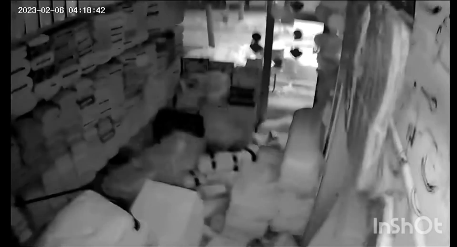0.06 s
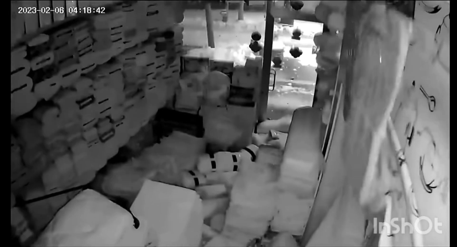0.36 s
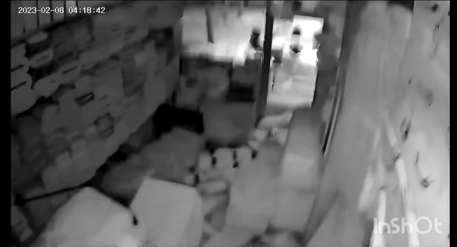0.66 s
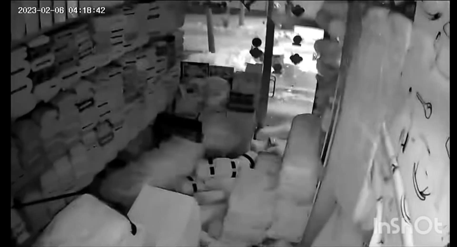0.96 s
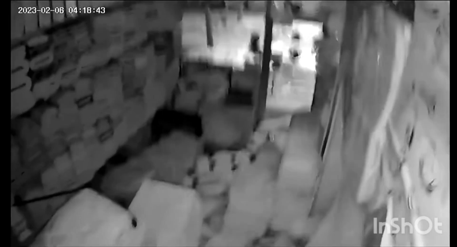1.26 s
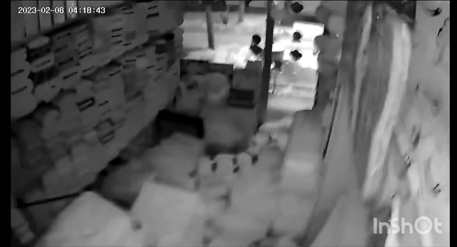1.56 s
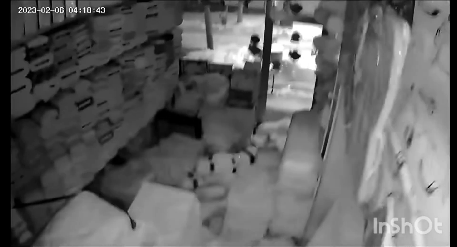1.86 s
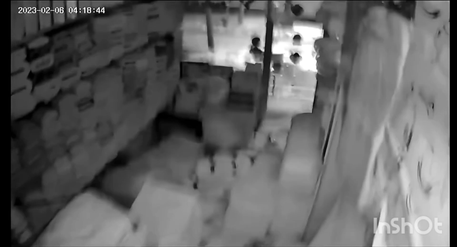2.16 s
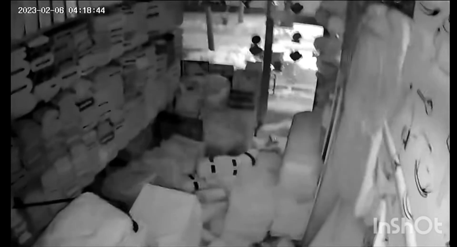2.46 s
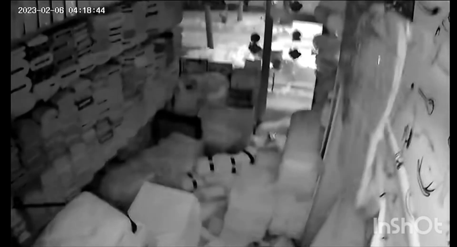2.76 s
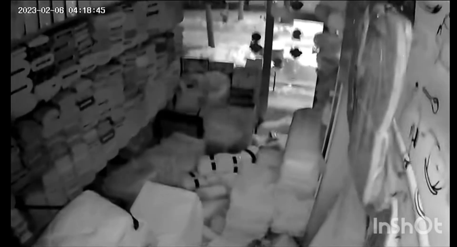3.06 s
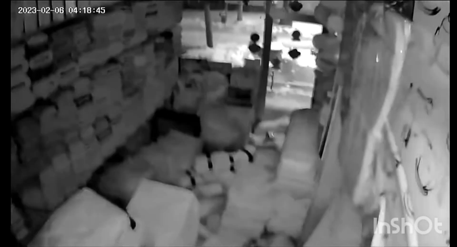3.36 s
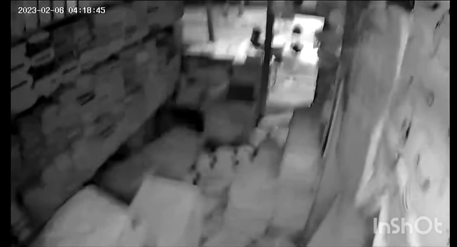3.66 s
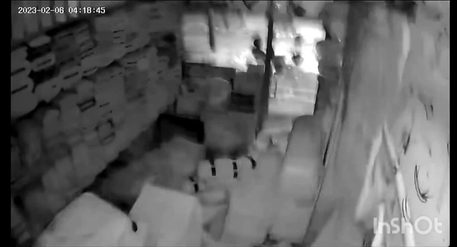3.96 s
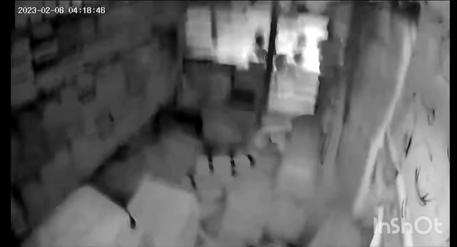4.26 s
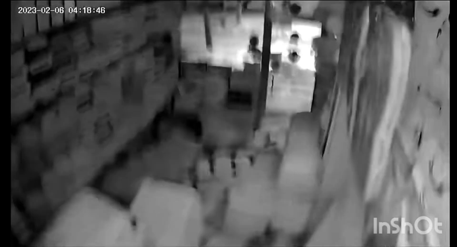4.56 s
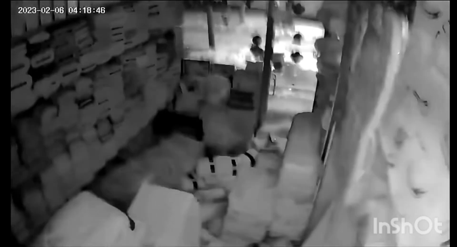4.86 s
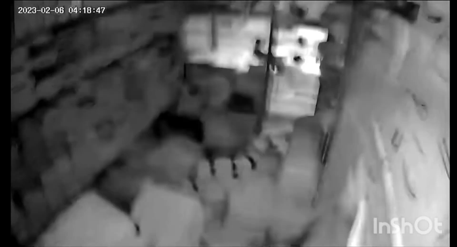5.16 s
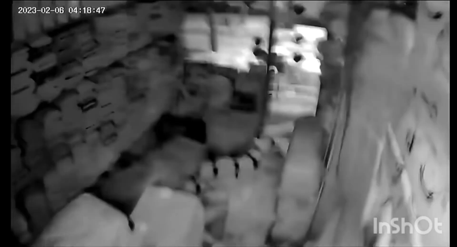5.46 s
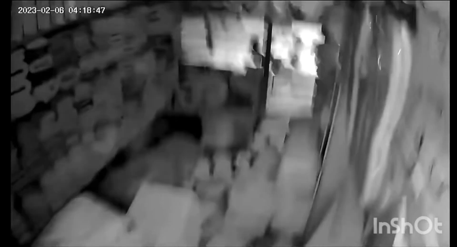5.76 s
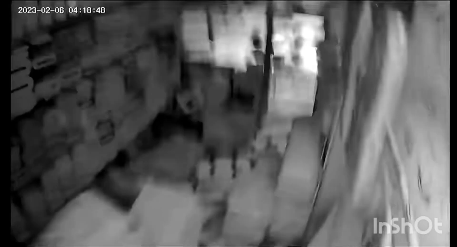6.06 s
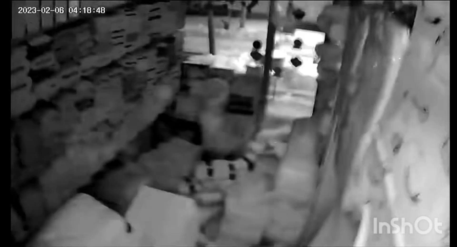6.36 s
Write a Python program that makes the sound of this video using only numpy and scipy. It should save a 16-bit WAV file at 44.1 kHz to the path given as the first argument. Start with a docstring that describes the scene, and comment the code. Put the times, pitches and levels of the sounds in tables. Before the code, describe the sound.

Heard through the thin microphone of a wall-mounted security camera, a packed stockroom starts to shake in an earthquake. Soft hollow knocks and a faint judder of shelving come first, above a low building rumble. The rattling swells in surges, joined by clinking, tumbling goods, dull thuds and sharper knocks. It is loudest at the end, when three close, distorted slams cut through the clatter.

```python
"""A faint rattle of shelves over a low rumble comes first: an earthquake is building in a shop stockroom.
The microphone is in a security camera on the wall. Out in the room each lurch shakes the shelves harder,
boxes knock, low thuds sound, and small goods work loose, tumble and clink. Near the end, three hard slams
right beside the microphone, each with a deep thump under it, overload its thin, narrow-band sound."""
import sys
import numpy as np
from scipy import signal
from scipy.fft import rfft, irfft
from scipy.io import wavfile
from scipy.ndimage import uniform_filter1d

SR = 44100
rng = np.random.default_rng(int(sys.argv[2]) if len(sys.argv) > 2 else 0)


def to_wav(sig):
    """Store sig (one row per channel, or 1-D mono) as 16-bit WAV at the path in sys.argv[1].

    Samples outside -1..1 are clipped; the rate is SR.
    """
    pcm = np.clip(np.atleast_2d(sig), -1, 1) * 32767
    pcm = np.round(pcm).astype(np.int16)
    wavfile.write(sys.argv[1], SR, pcm.T)  # frames by channels


N = 290619
TIME = np.arange(N) / SR
EVENT_TIME = TIME[:SR // 2]


def undb(db):
    """Decibels to gain."""
    return 10 ** (np.asarray(db) / 20)


def unit(x):
    """Scale to rms 1."""
    return x / np.sqrt(np.mean(x ** 2))


def add(out, start_s, x):
    """Mix x into out from start_s on."""
    i = max(int(start_s * SR), 0)
    out[i:i + len(x)] += x[:N - i]


def colour(x, spectrum):
    """Causal filter shaped by (frequency [Hz], level [dB]) points; white noise keeps its level."""
    size = 4096
    hz, db = np.transpose(spectrum)
    grid_hz = np.maximum(np.arange(size // 2 + 1) * SR / size, 1)
    gain = undb(np.interp(np.log(grid_hz), np.log(hz), db))
    cepstrum = irfft(np.log(gain))
    cepstrum[size // 2:] = 0  # minimum phase
    response = irfft(np.exp(2 * rfft(cepstrum)))
    return signal.fftconvolve(x, response / np.linalg.norm(response))[:len(x)]


def wander(rate):
    """Random drift of rms 1, turning rate times a second."""
    hold = int(SR / rate)
    steps = np.repeat(rng.standard_normal(N // hold + 1), hold)
    return unit(uniform_filter1d(steps, hold)[:N])


def fade(t60):
    """Exponential decay, 60 dB down after t60 seconds."""
    return np.exp(-np.log(1000) * EVENT_TIME / t60)


def swell(rise_s):
    """A body takes up a blow and gives it off again: peak 1 after rise_s."""
    return EVENT_TIME / rise_s * np.exp(1 - EVENT_TIME / rise_s)


def tone(hz):
    """One free vibration."""
    return np.sin(2 * np.pi * hz * EVENT_TIME)


def room(x, t60, wet_db):
    """The small, packed stockroom: direct sound, then a short diffuse tail at the microphone."""
    tail = rng.standard_normal(len(EVENT_TIME)) * fade(t60) * (EVENT_TIME > .004)
    return x + undb(wet_db) * signal.fftconvolve(x, tail / np.linalg.norm(tail))[:N]


def contacts(rate, spread_db):
    """Tiny random impacts of unequal strength, about rate a second."""
    hits = rng.random(N) < rate / SR
    strength = undb(spread_db * np.clip(rng.standard_normal(N), -2, 2))
    polarity = np.sign(rng.random(N) - .5)
    return unit(hits * polarity * strength)


def chatter(rate, spread_db, t60, wet_db, spots):
    """Things chattering at several spots in the room, each with its own echoes."""
    return sum(room(contacts(rate, spread_db), t60, wet_db) for _ in range(spots))


def jostle(rate, low_hz, high_hz, spread_db, ring_s):
    """Things bump one another at random, each with its own short note."""
    out = np.zeros(N)
    for when, pitch, size, length in rng.random((int(rate * N / SR), 4)):
        hz = low_hz + (high_hz - low_hz) * pitch
        rise_s = ring_s * (.5 + length)
        note = (tone(hz) * swell(rise_s))[:int(10 * rise_s * SR)]
        add(out, when * N / SR, undb(spread_db * size) * note)
    return unit(out)


# The slow build-up throughout the room: (time [s], shelf level [dB], rumble level [dB])
BUILD_UP = [(0.0, -56, -67), (0.34, -62.5, -68), (0.9, -59.5, -69), (1.15, -63.5, -74), (1.48, -60, -72),
            (1.72, -66, -78), (2.02, -47, -63), (2.3, -54, -67), (2.62, -44, -65.5), (2.9, -48.5, -59.5),
            (3.1, -43.5, -52), (3.419, -45, -53), (3.9, -40, -47), (4.55, -34, -47.5), (5.1, -32.5, -44),
            (5.38, -39.5, -46.5), (6.08, -35, -47), (6.59, -29, -41)]
# Lurches that rattle the shelves harder: (time [s], peak level [dB], rise [s])
GROUND_LURCHES = [(0.0, -48.5, 0.019), (0.51, -48, .018), (0.674, -52.5, 0.0084), (1.795, -47, 0.033),
                  (1.97, -46, 0.059), (2.15, -49, .025), (2.37, -46.5, .035), (2.67, -50, 0.079),
                  (2.98, -42, 0.045), (3.172, -38.5, 0.056), (3.46, -38, 0.06), (3.558, -39.5, 0.058),
                  (3.801, -34, 0.041), (4.039, -25, 0.029), (4.29, -32.5, 0.029), (4.63, -28.5, 0.058),
                  (4.779, -26, .024), (5.056, -26, 0.02), (5.219, -32.5, 0.021), (5.5, -38.5, 0.019),
                  (5.99, -43, 0.017), (6.15, -22.5, 0.03), (6.4, -22.5, 0.047), (6.501, -24.5, 0.019)]


def quake_levels():
    """Shelf and rumble levels in dB: lurches swell and die away on top of the build-up."""
    times, shelf_db, rumble_db = np.transpose(BUILD_UP)
    lurch_power = np.zeros(N)
    for start_s, db, rise_s in GROUND_LURCHES:
        add(lurch_power, start_s, (undb(db) * swell(rise_s)) ** 2)
    lurch = np.sqrt(lurch_power)
    shelf_gain = np.hypot(undb(np.interp(TIME, times, shelf_db)), lurch)
    rumble_gain = np.hypot(undb(np.interp(TIME, times, rumble_db)), undb(-11) * lurch)
    return 20 * np.log10([shelf_gain, rumble_gain])


# The building, all around the microphone: (frequency [Hz], level [dB])
BUILDING_SPECTRUM = [(20, -6.5), (40, -15.5), (70, 2.5), (110, 4), (160, 7.5), (220, 3), (400, -44.5)]


def building_rumble(level_db):
    """The shaken building gives off a low noise."""
    return unit(colour(rng.standard_normal(N), BUILDING_SPECTRUM)) * undb(level_db)


# Small goods around the room, more echo than direct sound: (frequency [Hz], level [dB])
GOODS_SPECTRUM = [(700, -26), (1300, 6), (1900, 2), (2600, -4.5), (3300, -2.5), (3900, -1), (4400, -30)]


def goods_chatter(shelf_db, jolts):
    """Small goods chatter as the shelves shake; friction holds them back until they work loose."""
    strong_shaking_db, growth, stuck_db = -35, 1.1, 5.5
    held_db = stuck_db * np.interp(TIME, (4, 1.94), [1, 0])
    level_db = -56.5 + growth * (shelf_db - strong_shaking_db) - held_db
    ticks = chatter(rate=130, spread_db=1.5, t60=.06, wet_db=6.5, spots=3)
    return unit(colour(ticks, GOODS_SPECTRUM)) * undb(level_db + 2 * jolts)


# Loaded shelves, heard from the wall: (frequency [Hz], level [dB])
SHELF_SPECTRUM = [(70, -47.5), (130, -20), (180, -2), (280, 0), (450, 0.5), (620, 1), (830, 4.5),
                  (1000, -4), (1250, -16.5), (1700, -34), (2400, -39), (3900, -43)]


def shelf_rattle(shelf_db, jolts):
    """The shelves judder while their loads bump together."""
    ticks = chatter(rate=150, spread_db=0.5, t60=0.12, wet_db=-3.5, spots=5)
    judder = unit(colour(ticks, SHELF_SPECTRUM))
    bumps = jostle(rate=110, low_hz=156.7, high_hz=1011, spread_db=25.5, ring_s=0.0038)
    return unit(judder + undb(-3) * bumps) * undb(shelf_db + 0.56 * jolts)


# The bright clatter of spilling goods: (frequency [Hz], level [dB])
SPILL_SPECTRUM = [(600, -13.5), (1300, -7), (2100, 2), (2800, -5.5), (3500, 2.5), (3900, 5.5),
                  (4400, -28.5)]
# Small goods tumbling, away from the microphone: (time [s], level [dB], rise [s])
GOODS_TUMBLES = [(2.125, -68.5, 0.018), (2.171, -57.5, 0.0029), (2.208, -55, 0.0079), (2.44, -67, .025),
                 (2.66, -61, 0.041), (3.011, -49, 0.0049), (3.077, -52, 0.003), (3.47, -61, 0.0095),
                 (3.621, -59.5, 0.034), (3.834, -38, 0.0057), (4.055, -57.5, 0.021), (4.663, -40.5, 0.0088),
                 (4.793, -29, 0.0092), (4.818, -33, 0.0056), (4.93, -43, 0.048), (5.078, -38, 0.0059),
                 (5.13, -51.5, 0.056), (5.264, -55, 0.0091), (5.761, -43, 0.021), (6.087, -44, 0.012),
                 (6.227, -36.5, 0.0086), (6.264, -46, 0.044), (6.508, -37.5, 0.012)]


def tumbles():
    """Quick flurries of light, hard contacts and the brief notes that they strike."""
    flurries = np.zeros(N)
    for start_s, db, rise_s in GOODS_TUMBLES:
        add(flurries, start_s, undb(db) * swell(rise_s))
    ticks = colour(contacts(rate=2000, spread_db=10), SPILL_SPECTRUM)
    notes = jostle(rate=600, low_hz=1528, high_hz=3733, spread_db=1.5, ring_s=.0018)
    return flurries * unit(ticks + notes)


# Hard goods ringing out in the room: (time [s], peak level [dB], pitch [Hz], rise [s])
GOODS_CLINKS = [(0.0, -69.5, 3200, 0.047), (0.12, -72.5, 3290, 0.11), (0.375, -67.5, 3220, 0.0078),
                (0.508, -67, 3320, 0.012), (0.855, -67, 2000, 0.013), (1.29, -66, 1640, 0.0044),
                (1.41, -72, 3220, 0.0024), (1.456, -63, 1920, 0.017), (1.925, -53.5, 3200, 0.0024),
                (1.965, -46, 3260, 0.0042), (1.993, -57, 3200, 0.0024), (2.016, -54.5, 3250, 0.0053),
                (2.021, -50, 2030, 0.0056), (2.13, -69, 1860, .02), (2.538, -50.5, 3400, 0.0044),
                (2.597, -60.5, 3260, 0.0065), (2.632, -47, 3224, 0.0096), (2.663, -43, 1953, 0.015),
                (3.014, -38.5, 3500, 0.0028), (3.256, -53, 3280, 0.0077), (3.334, -41.5, 3254, 0.0045),
                (3.47, -44, 1574, .008), (3.834, -37, 3510, 0.003), (4.055, -37, 1955, 0.019),
                (4.602, -43, 3120, 0.0038), (4.639, -40, 3235, 0.0032), (4.799, -25.5, 2155, 0.006),
                (5.06, -26, 3760, 0.0026), (5.061, -29, 1730, 0.0038), (5.066, -24, 3365, 0.0047),
                (5.235, -32.5, 3285, 0.0029), (5.294, -40.5, 3370, 0.0013)]


def clinks():
    """Hard pieces touch in quick succession and ring; a longer jingle spreads wider in pitch."""
    out = np.zeros(N)
    touches = contacts(rate=970, spread_db=2.5)
    for start_s, db, hz, rise_s in GOODS_CLINKS:
        spread_hz = min(7000 * rise_s, 320)
        jingle = 0
        for detune in np.linspace(-1, 1, num=5):
            first = int(rng.random() * (N - len(EVENT_TIME)))
            drive = touches[first:first + len(EVENT_TIME)] * swell(rise_s)
            ring = tone(hz + detune * spread_hz) * fade(0.045) * undb(-5 * abs(detune))
            jingle = jingle + signal.fftconvolve(drive, ring)
        add(out, start_s, undb(db) * jingle / np.abs(jingle).max())
    return out


# Low thuds, including the deep thump under each of the three close slams:
# (time [s], level [dB], pitch [Hz], rise [s])
LOW_THUDS = [(0.01, -48.5, 287, 0.012), (1.8, -42.5, 188, 0.0073), (2.386, -45, 127, .006),
             (3.581, -43, 108, 0.011), (3.797, -23.5, 141, 0.0033), (4.112, -29.5, 139, 0.0077),
             (4.962, -25.5, 135, 0.0055), (5.026, -30, 69.6, 0.0029), (5.558, -29, 89, 0.012),
             (5.803, -21, 99.5, 0.0043), (6.165, -29, 151, 0.0064), (6.191, -11.5, 100, 0.0061),
             (6.405, -25, 136, 0.0064)]


def thuds():
    """A soft, heavy push: a low note and a dull shudder of the shelves."""
    out = np.zeros(N)
    for start_s, db, hz, rise_s in LOW_THUDS:
        shudder = undb(-10.5) * colour(rng.standard_normal(len(EVENT_TIME)), SHELF_SPECTRUM)
        add(out, start_s, undb(db) * swell(rise_s) * (tone(hz) + shudder))
    return out


# Boxes knocking on shelves across the room:
# (time [s], level [dB], pitch [Hz], tick trim [dB], rise of the contents' rattle [s])
BOX_KNOCKS = [(0.014, -49, 840, -30, 0.017), (0.511, -38, 810, -44, 0.0026),
              (0.526, -34.5, 540, -47, 0.0079), (0.682, -34, 805, -54, 0.0033),
              (0.694, -34, 817, -56, 0.0059), (0.844, -43, 502, -28, 0.011),
              (0.912, -41.5, 894, -41, 0.0082), (1.042, -39, 494, -50, 0.0082),
              (1.226, -42, 786, -47, 0.012), (1.291, -39, 783, -42, 0.014), (1.458, -47, 914, -35, 0.0083),
              (1.562, -46.5, 710, -29, 0.014), (1.743, -43, 920, -44, 0.0071),
              (1.794, -37, 850, -56, 0.013), (1.803, -29, 747, -59, 0.0094),
              (1.928, -34.5, 790, -36, 0.012), (1.99, -31.5, 890, -33, 0.0097),
              (2.172, -29, 910, -36, 0.0078), (2.213, -30.5, 883, -14.5, 0.005),
              (2.354, -31, 900, -22, 0.0052), (2.392, -33, 863, -47, 0.0075), (2.455, -29, 790, -27, 0.011),
              (2.827, -24, 826, -17, 0.004), (2.984, -29, 772, -19.5, 0.0091),
              (3.017, -27.5, 690, -32, 0.0025), (3.06, -28, 970, -36, 0.0069),
              (3.176, -24, 694, -52, 0.0028), (3.461, -26.5, 890, -26, 0.0067),
              (3.576, -22, 672, -20.5, 0.0034), (3.823, -17.5, 726, -21.5, 0.0054),
              (3.921, -12, 757, -11, 0.0032), (3.926, -17.5, 910, -18, 0.003),
              (4.056, -13.5, 600, -22.5, 0.0062), (4.072, -16, 724, -31.5, 0.02),
              (4.102, -23, 740, -36, 0.0035), (4.114, -13.5, 700, -43, 0.0045),
              (4.287, -25.5, 700, -34, 0.0048), (4.529, -16, 377, -54, 0.0021),
              (4.644, -19.5, 680, -31.5, 0.0055), (4.666, -8.5, 816, -35, 0.0034),
              (4.835, -13, 880, -31, 0.0048), (4.972, -20, 650, -23, 0.0072),
              (5.181, -22.5, 750, -15, 0.0063), (5.204, -17, 592, -24, 0.0055),
              (5.266, -20.5, 850, -38, 0.012), (5.401, -25.5, 853, -26, 0.0038),
              (5.442, -26, 788, -13, 0.0043), (5.684, -19, 456, -50, 0.01), (5.733, -7, 582, -21.5, 0.0041),
              (5.767, -16.5, 566, -14, 0.012), (6.026, -20.5, 677, -28, 0.0019),
              (6.346, -19.5, 770, -38, 0.0037), (6.361, -12.5, 496, -15, 0.015),
              (6.423, -16, 860, -16, 0.0023), (6.452, -11.5, 813, -15.5, 0.0017),
              (6.509, -7, 842, -15.5, 0.0034), (6.561, -14, 746, -17.5, 0.002)]


def knocks():
    """A hollow note, a tick at the contact, and the contents rattling on, which keeps the box ringing."""
    out = np.zeros(N)
    for start_s, db, hz, tick_db, rise_s in BOX_KNOCKS:
        contents_noise, tick_noise = rng.standard_normal((2, len(EVENT_TIME)))
        box = tone(hz) * swell(0.0025)
        contents = contents_noise * swell(rise_s)
        ringing = signal.fftconvolve(contents, box / np.linalg.norm(box))[:len(EVENT_TIME)]
        rattle = undb(-11.5) * colour(contents, SHELF_SPECTRUM) + undb(-17.5) * ringing
        tick = colour(tick_noise * swell(0.003), GOODS_SPECTRUM) * undb(tick_db - 8.5)
        add(out, start_s, undb(db) * (undb(-3) * box + rattle + tick))
    return out


# Three slams right beside the microphone, each of two or three blows:
# (time [s], level [dB], pitch [Hz], rise [s], relative crack level [dB])
CLOSE_SLAMS = [(5.009, -15, 614, 0.0062, -15), (5.0143, -15, 565, 0.0041, -7.5),
               (5.0243, 6.5, 537, 0.0031, -18), (5.8047, 8.5, 582, 0.0016, -18),
               (5.8151, 1, 538, 0.0027, -33), (6.395, -15, 843, 0.0037, -16),
               (6.404, 1.5, 670, 0.0012, -26)]


def slams():
    """A hard blow drives a panel's main mode and a weaker upper one, with a crack on top."""
    out = np.zeros(N)
    for start_s, db, hz, rise_s, crack_db in CLOSE_SLAMS:
        body_noise, crack_noise = rng.standard_normal((2, len(EVENT_TIME)))
        panel = (tone(hz) + undb(-9) * tone(1.5 * hz)) * swell(rise_s)
        body = colour(body_noise * fade(0.035), SHELF_SPECTRUM) * undb(-10)
        crack = colour(crack_noise * fade(0.028), SPILL_SPECTRUM) * undb(crack_db)
        add(out, start_s, undb(db) * (panel + body + crack))
    return out


def scene():
    """The stockroom from the wall, in mono; the slams are too close to carry much room."""
    impacts = room(knocks() + thuds() + tumbles(), t60=0.19, wet_db=-9.5)
    ringing = room(clinks(), t60=0.3, wet_db=-8)
    shelf_db, rumble_db = quake_levels()
    jolts = wander(rate=45)  # shelves and small goods feel the same quick jolts
    shaking = building_rumble(rumble_db) + shelf_rattle(shelf_db, jolts) + goods_chatter(shelf_db, jolts)
    return (shaking + impacts + ringing + slams())[None]


def record(dry):
    """The camera's microphone channel: sampled at a low rate, faintly hissy, overloaded by the slams."""
    mic_rate_hz, mic_top_hz, output_top_hz, ceiling = 8000, 7200, 15750, .715
    coarse = signal.resample_poly(dry[0], mic_rate_hz, SR)
    # Doubling the rate by straight lines mirrors the sound into the treble.
    doubled = np.interp(np.arange(2 * len(coarse)) / 2, np.arange(len(coarse)), coarse)
    mirrored = signal.resample_poly(doubled, SR, 2 * mic_rate_hz)[:N]
    mic_lowpass = signal.ellip(8, .3, 60, mic_top_hz, fs=SR, output="sos")
    clipped = np.clip(signal.sosfilt(mic_lowpass, mirrored), -ceiling, ceiling)
    hiss = undb(-90) * rng.standard_normal(N)
    output_lowpass = signal.ellip(8, .2, 70, output_top_hz, fs=SR, output="sos")
    return signal.sosfilt(output_lowpass, clipped + hiss)[None]


dry = scene()
out = record(dry)
to_wav(out)
```